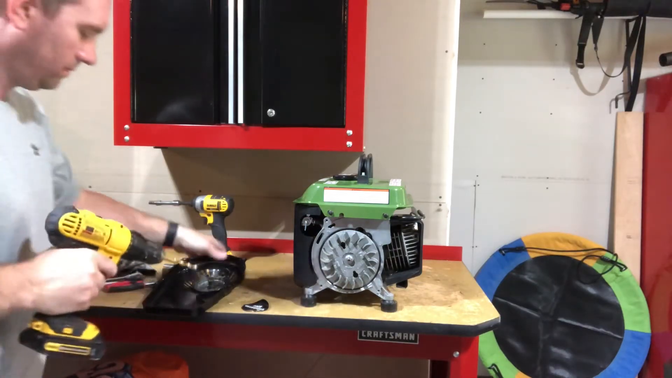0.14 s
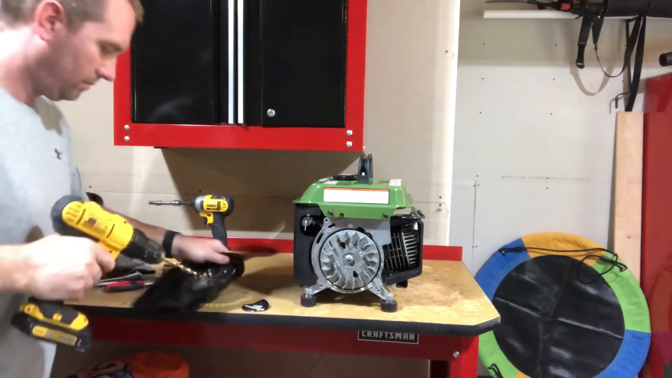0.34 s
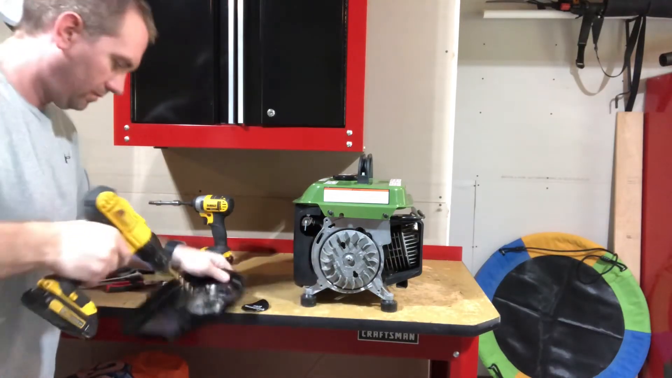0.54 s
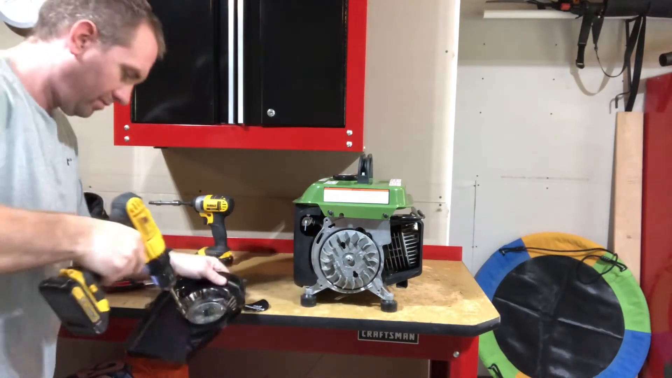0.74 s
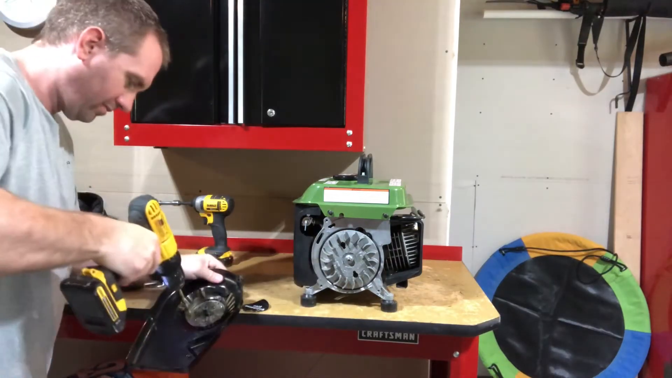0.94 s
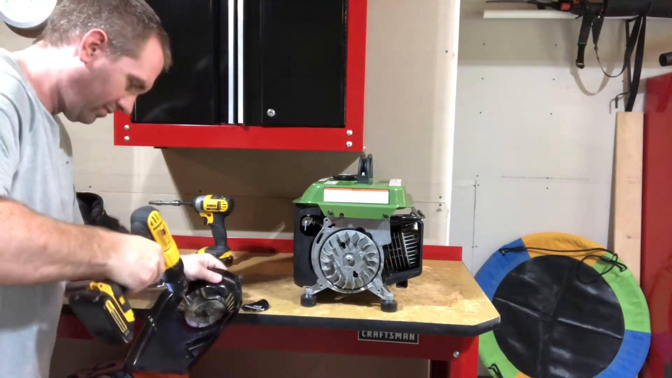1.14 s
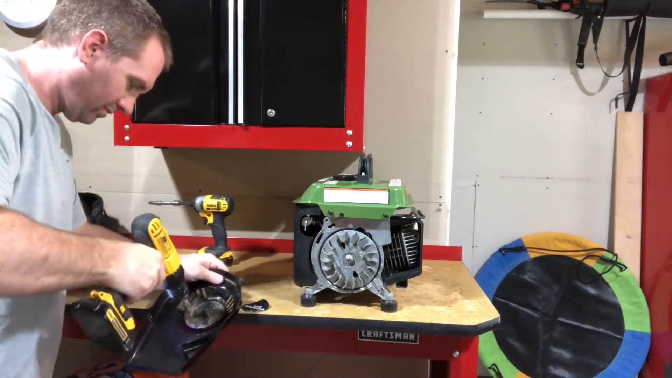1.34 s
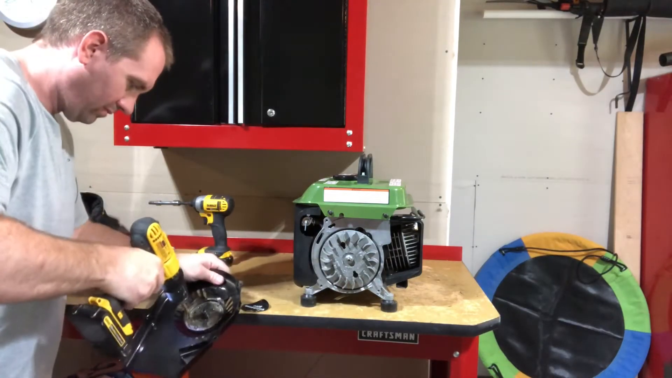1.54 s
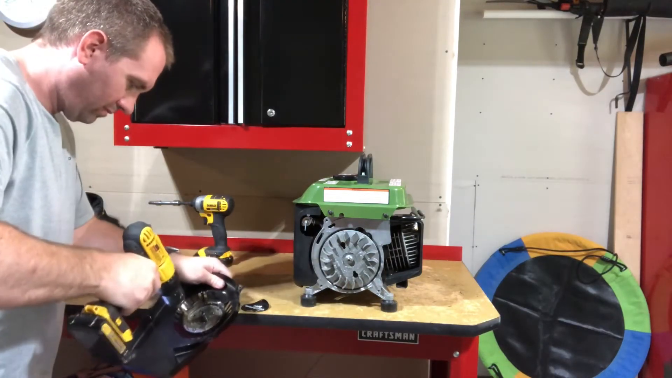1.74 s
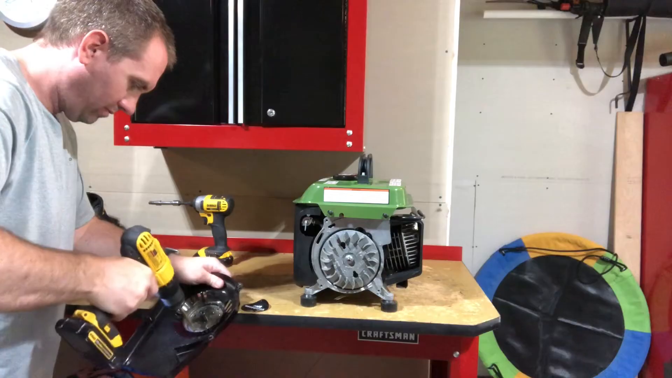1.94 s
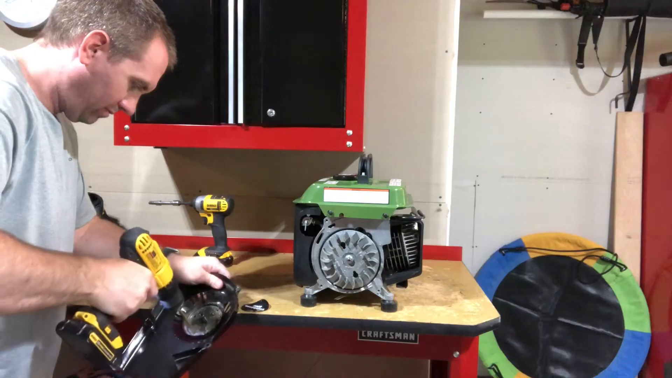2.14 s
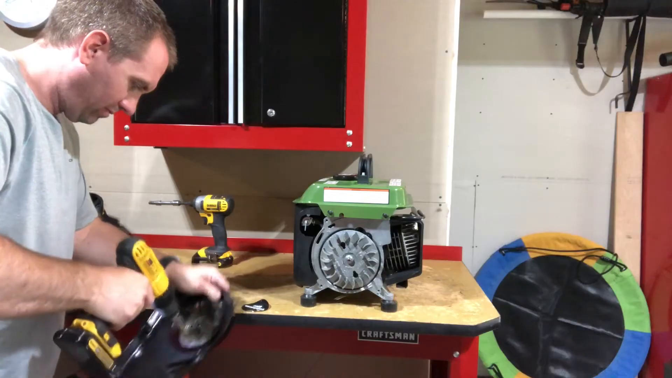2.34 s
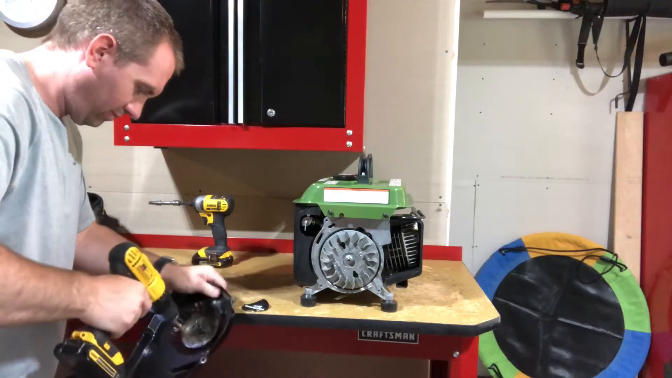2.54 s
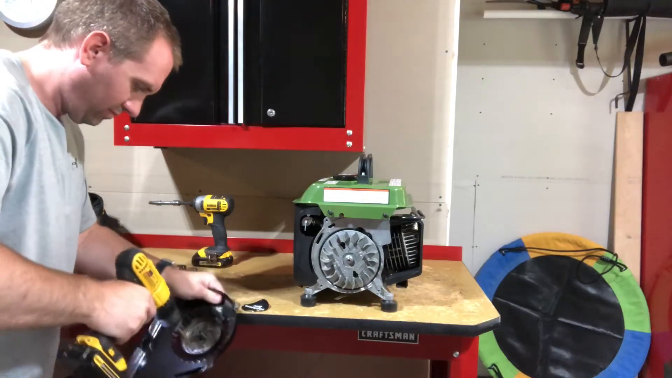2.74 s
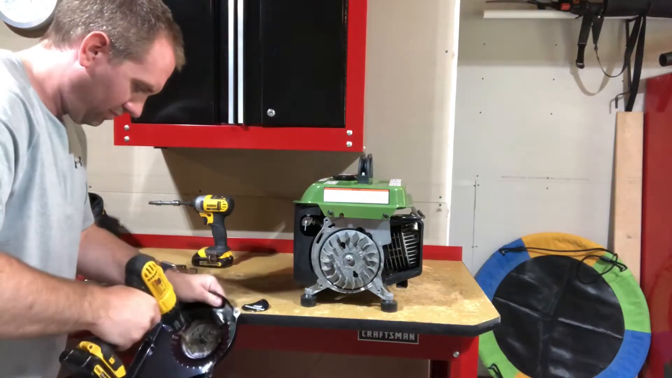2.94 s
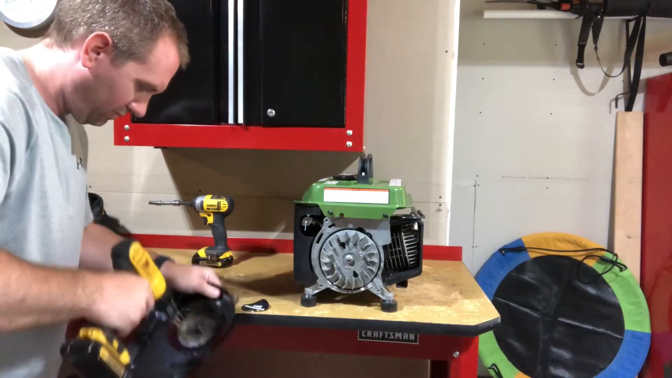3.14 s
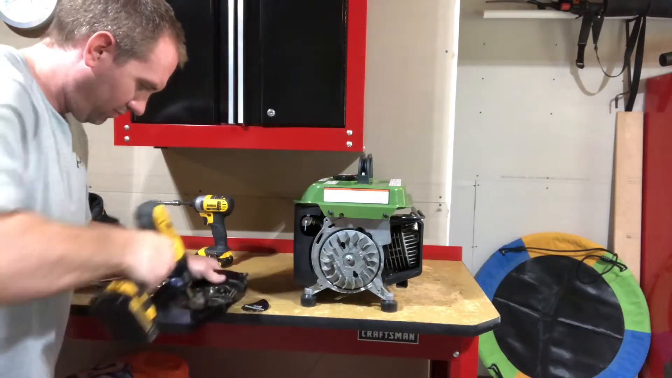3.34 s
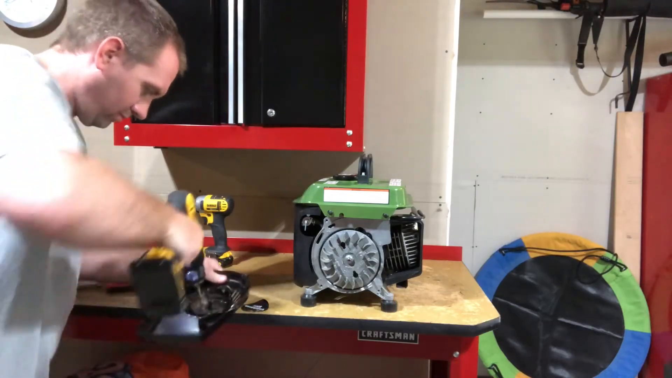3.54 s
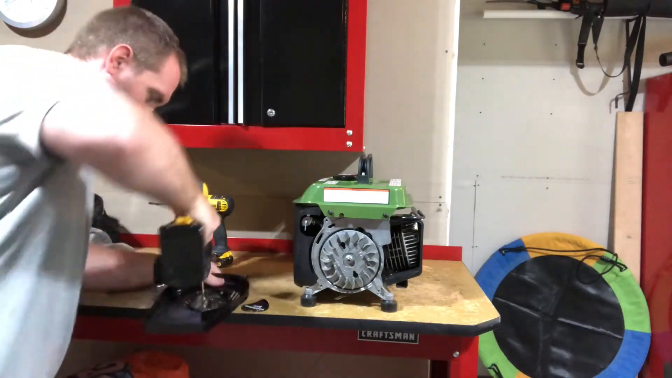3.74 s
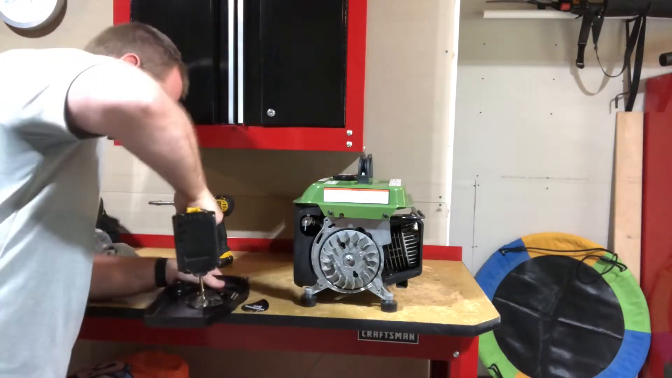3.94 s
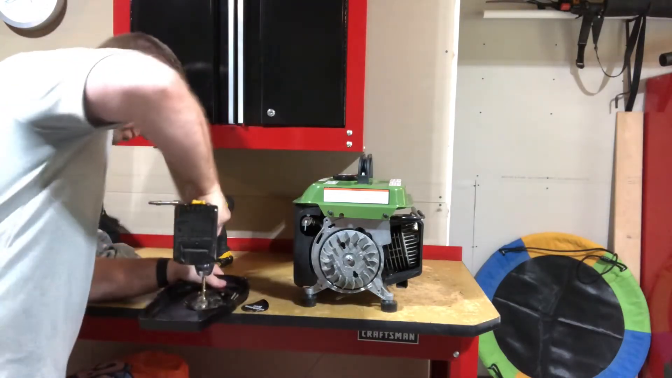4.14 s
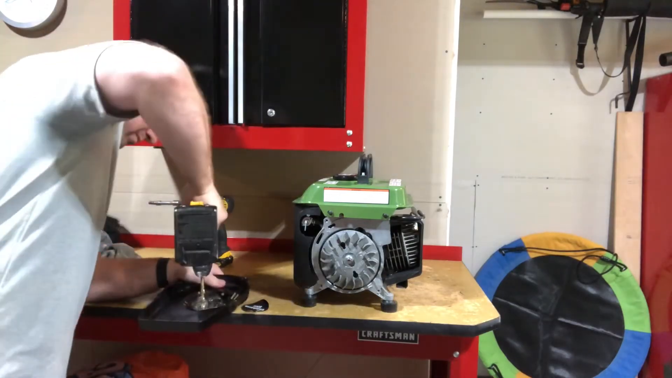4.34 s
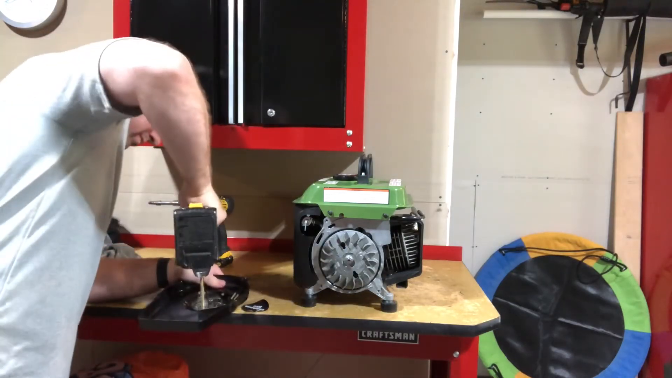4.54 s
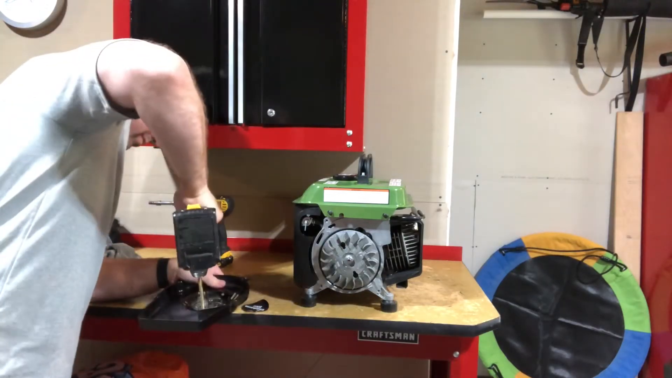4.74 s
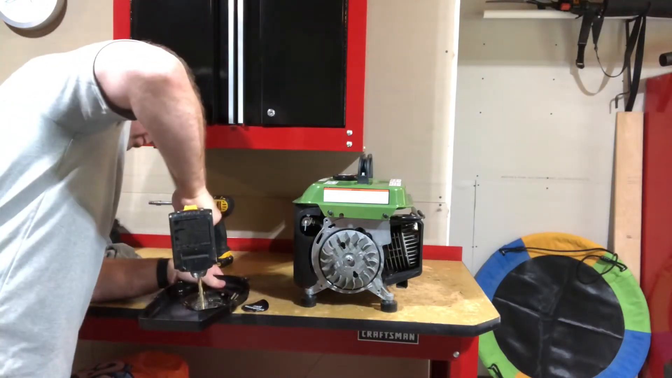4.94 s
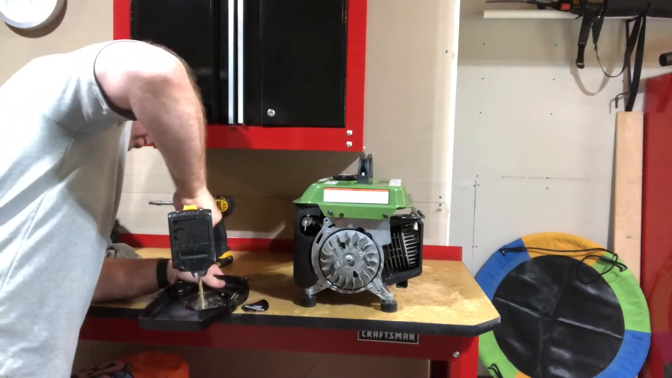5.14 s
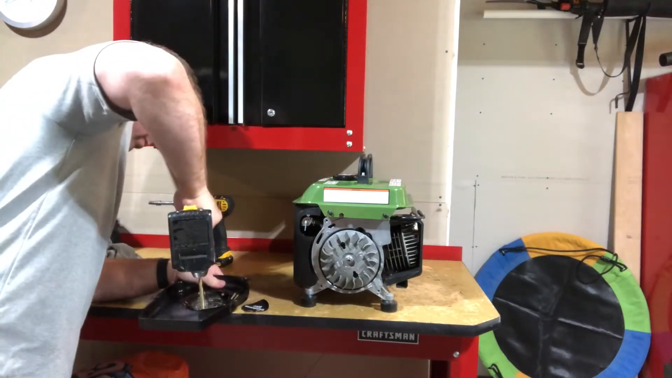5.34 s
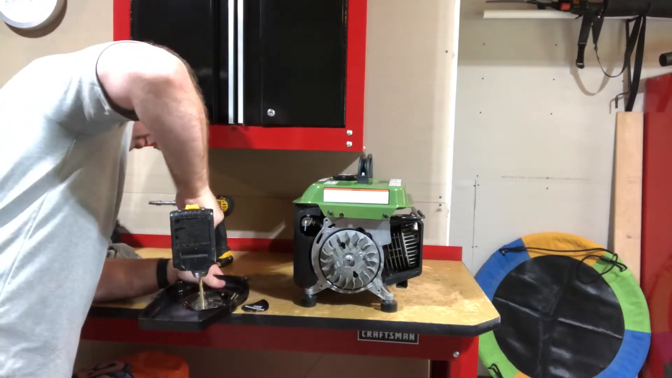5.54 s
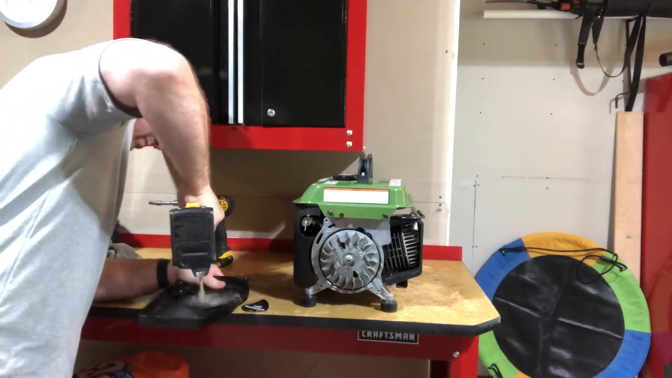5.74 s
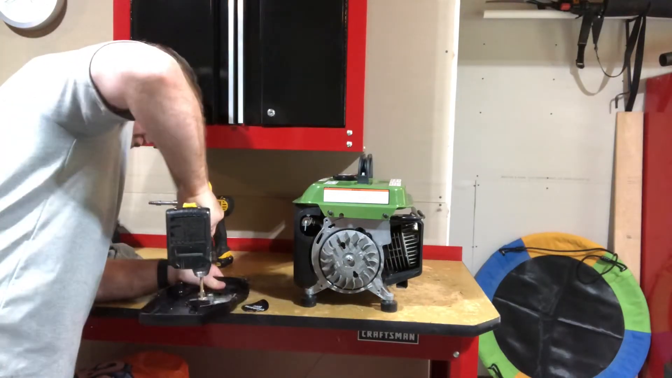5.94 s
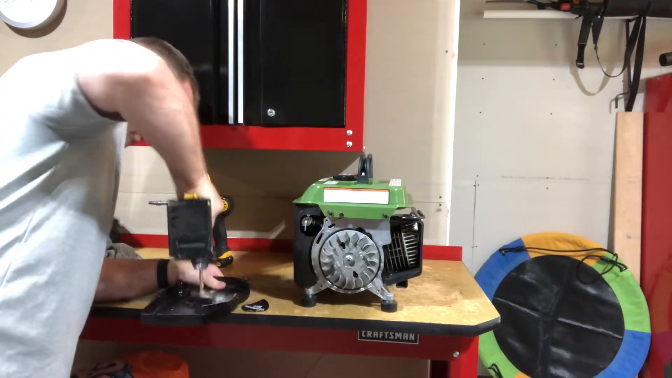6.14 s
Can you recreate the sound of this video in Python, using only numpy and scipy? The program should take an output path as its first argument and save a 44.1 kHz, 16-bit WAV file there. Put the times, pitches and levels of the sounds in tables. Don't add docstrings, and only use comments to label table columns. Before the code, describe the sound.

A bare, echoing garage with faint low air, heard close through one microphone. From 0 s, light rubbing; at 0.25 s a solid woody clunk as a drill is set down, with a bright cloth rustle, then a metal cover knocking the bench near 0.6 s. Faint touches and small clicks follow until 1.7 s. At 1.75 s the cordless drill runs free: gritty gears, airy hiss, a whine rising fast, holding, then gliding down from 2.4 s and stopping with sharp clicks near 2.8 s. Between 3.1 and 3.9 s, rubbing and knocks, strongest at 3.45 s, then a rattling cluster at 3.8 s. Boring starts at 4.33 s: whine leaps up, sags under load to its lowest around 4.9 s over a low bench hum, then recovers. At 5.6 s the bit catches; the sheet bangs, scrapes and rings, violently overloaded, ending about 5.9 s in a short echo.

```python
import sys
import numpy as np
from scipy import signal
from scipy.fft import rfft, irfft, next_fast_len
from scipy.io import wavfile

SR = 44100
rng = np.random.default_rng(int(sys.argv[2]) if len(sys.argv) > 2 else 0)


def to_linear_factor(level_db):
    exponent = np.asarray(level_db, float) / 20
    return 10 ** exponent


def wav_out(sig):
    wavfile.write(sys.argv[1], SR, np.round(np.clip(np.atleast_2d(sig).T, -1, 1) * 32767).astype(np.int16))


N = 272537
TIME_S = np.arange(N) / SR
BORING_FROM_S = 3.5


def rms_one(x):
    return x / np.sqrt(np.mean(x ** 2) + 1e-20)


def in_time(tables, columns, hold_s=0):
    rows = []
    silent = [-130] * columns
    for table in tables:
        start, end = table[0][0], table[-1][0] + hold_s
        rows += [(start - .003, *silent), *table]
        rows += [(end, *table[-1][1:]), (end + .004, *silent)]
    s, *values = np.transpose(rows)
    return [np.interp(TIME_S, s, v) for v in values]


def free_or_boring(free, boring):
    return np.where(TIME_S < BORING_FROM_S, free, boring)


def joining(starts, time_s):
    latest = np.clip(np.searchsorted(starts, TIME_S) - 1, 0, None)
    since = TIME_S - np.asarray(starts)[latest]
    return 20 * np.log10(np.clip(1 - np.exp(-(np.abs(since) / time_s) ** 2), 1e-4, 1))


def at_hz(points, hz):
    points_hz, values = np.transpose(points)
    return np.interp(np.log(hz + 1), np.log(points_hz), values)


def colour(x, spectrum):
    size = next_fast_len(len(x))
    hz = np.arange(size // 2 + 1) * SR / size
    skirt = np.minimum(1, np.minimum(hz / spectrum[0][0], spectrum[-1][0] / (hz + 1))) ** 6
    shaped = rfft(x, size) * to_linear_factor(at_hz(spectrum, hz)) * skirt
    return rms_one(irfft(shaped, size)[:len(x)])


def band(x, low_hz, high_hz):
    return signal.sosfilt(signal.butter(2, [low_hz, high_hz], "band", fs=SR, output="sos"), x)


def dull(x, hz):
    return signal.sosfilt(signal.butter(2, hz, fs=SR, output="sos"), x)


def drift(rate):
    r = np.exp(-80 * np.pi * rate / SR)
    slow = signal.lfilter([1], [1, -2 * r, r * r], rng.standard_normal(N // 40 + 2002))[2000:]
    return np.interp(np.arange(N) / 40, np.arange(len(slow)), rms_one(slow))


def grains(per_s, spread_db):
    sizes = to_linear_factor(spread_db * np.minimum(rng.exponential(1, N), 5)) * rng.choice([-1, 1], N)
    return rms_one(sizes * (rng.random(N) < per_s / SR))


def resonate(x, peaks, gain_db, shifting_db=0):
    out = x.copy()
    for hz, width_hz, level_db in peaks:
        r = np.exp(-np.pi * width_hz / SR)
        swell_db = shifting_db * drift(10.2) if shifting_db else 0
        poles = [1, -2 * r * np.cos(2 * np.pi * hz / SR), r * r]
        peak = signal.lfilter([(1 - r * r) / 2, 0, (r * r - 1) / 2], poles, x)
        out += to_linear_factor(level_db + gain_db + swell_db) * peak
    return out


def ring(push, modes):
    out = 0
    for k, (hz, level_db, t60) in enumerate(modes):
        r, w = to_linear_factor(-60 / (t60 * SR)), 2 * np.pi * hz / SR
        note = signal.lfilter([0, np.sin(w)], [1, -2 * r * np.cos(w), r * r], push + 1e-18)
        out = out + (-1) ** k * to_linear_factor(level_db) * note
    return out


# (pitch_hz, level_db per Hz)
AIR = [(25, -17), (75, 8), (200, 0.5), (500, -5), (1200, -8), (3000, -19.5), (8000, -24.5), (12000, -32),
       (15700, -30)]


def quiet_air():
    return to_linear_factor(-56) * colour(rng.standard_normal(N), AIR)


# (pitch_hz, t60_s)
GARAGE_T60 = [(100, 0.77), (300, 0.99), (900, 0.81), (2500, 1), (6000, 0.87), (13000, 0.7)]
# (pitch_hz, level_db)
GARAGE_COLOUR = [(100, 5.5), (400, 2.5), (1500, -5.5), (5000, -3.5), (14000, -12)]


def garage(x):
    t = np.arange(round(1.2 * SR)) / SR
    white = rng.standard_normal((2, len(t)))
    edges = 40 * 2 ** np.arange(0, 9.1, .5)
    tail = 0
    for k, (low, high) in enumerate(zip(edges, edges[1:])):
        hz = np.sqrt(low * high)
        level_db = at_hz(GARAGE_COLOUR, hz) - 60 * t / at_hz(GARAGE_T60, hz)
        tail = tail + band(white[k % 2], low, high) * to_linear_factor(level_db)
    tail = tail * np.clip((t - .004) / 0.013, 0, 1)
    return signal.fftconvolve(x, tail)[:N]


CLOTH_S = [
    .33,
    .39,
    .46,
    .56,
    .8,
]
# (pitch_hz, level_db per Hz)
CLOTH = [(3000, -2), (8000, -3), (15000, -2)]


def cloth():
    shape_db = np.interp(TIME_S, CLOTH_S, [-15, 0, -10, -4, -14], left=-99, right=-99)
    return colour(grains(9000, 2.0), CLOTH) * to_linear_factor(-62 + shape_db)


# (time_s, level_db)
HANDLING = [
    [(0.0, -62), (0.17, -70)],
    [(0.19, -60), (0.55, -55)],
    [(0.88, -74), (1.12, -84)],
    [(1.34, -76), (1.74, -97)],
    [(3.1, -60), (3.4, -70.5)],
    [(3.48, -56), (3.75, -71)],
    [(3.8, -66), (4.28, -80)],
]
# (pitch_hz, level_db per Hz)
RUB = [(300, 10), (700, -4), (1500, 1), (3000, -3), (6000, -9), (12000, -45)]


def handling():
    level_db, = in_time(HANDLING, columns=1)
    return colour(grains(2500, 2.5), RUB) * to_linear_factor(level_db + 2.2 * drift(20))


# (time_s, level_db)
LEAN = [
    (4.58, -56),
    (4.7, -45),
    (4.85, -43),
    (4.97, -54),
]


def lean():
    wander = .012 * np.cumsum(rng.standard_normal(N))
    phase = 2 * np.pi * 77 * TIME_S + wander
    hum = np.sin(phase) + to_linear_factor(5) * np.sin(2 * phase)
    return hum * to_linear_factor(in_time([LEAN], columns=1)[0])


# (pitch_hz, level_db, t60_s)
THUD = [(84.7, -7, 0.14), (116, -0.5, 0.074), (171.5, 0.5, 0.091)]
# (pitch_hz, level_db, t60_s)
BENCH = [(259.8, -1.5, 0.11), (319, 1, 0.028), (432.7, 4, 0.067), (452, 7, 0.044), (563, 4, 0.031),
         (609, 4, 0.036), (796, 1.5, 0.013)]
# (pitch_hz, level_db, t60_s)
BODY = [(953, 10, 0.02), (1275, 16.5, 0.0061), (1522, -2, 0.18), (1650, -42, 0.073), (2240, -37, 0.09),
        (2400, -26, 0.045)]


def sound_parts(pushes, blows):
    thud = to_linear_factor(-32) * ring(band(blows[0], 50, 230), THUD)
    wood_ring = to_linear_factor(-22) * band(ring(blows[1], BENCH), 243, 3100)
    bench = dull(wood_ring + to_linear_factor(17) * band(pushes[1], 303, 1060), 850)
    body_rough = to_linear_factor(12.5) * band(pushes[2], 1220, 2820)
    body = dull(to_linear_factor(-31) * ring(pushes[2], BODY) + body_rough, 2000)
    tick = to_linear_factor(8.5) * signal.lfilter([.5], [1, -.45], band(pushes[3], 3300, 10600))
    return thud + bench + body + tick


# (time_s, peak_db, hardness_db, contact_ms)
TOOL_SET_DOWN = [
    (.247, -16, 0.8, 20),
]
COVER_ON_BENCH = [(.581, -28.5, 8, 25.5), (.646, -35, -12, 20), (0.93, -53, 10, 30), (1.341, -45, 4.5, 39),
                  (1.398, -66, -4, 12), (1.681, -42.5, -4, 80), (3.12, -45.5, -5, 38),
                  (3.175, -49, -12, 30), (3.315, -52, -10, 12), (3.451, -27, -10, 18.5), (3.51, -50, 9, 17),
                  (3.574, -40, -17, 10), (3.767, -42, 8, 16), (3.774, -37.5, 4.5, 31),
                  (3.792, -39.5, 5, 25), (3.783, -44, 1, 20), (3.8, -46, 0, 20), (3.81, -42, -6, 15),
                  (3.893, -55, 6, 13)]
SMALL_CLICKS = [(0.197, -62, 7, 25), (0.225, -46, -1, 32), (.256, -24, -7, 8), (0.37, -50, 3, 40),
                (1.362, -54, 7, 16), (1.589, -53, 3, 14), (1.71, -47, 10.5, 15), (2.726, -28.5, 6, 11),
                (2.815, -28, 5, 12), (2.839, -36, 8.5, 4.8), (2.848, -43.5, 24.5, 7.9), (3.257, -42, 5, 11),
                (3.859, -56, -4, 7.5), (4.283, -44.5, -0.5, 17), (4.332, -45, -8, 22), (5.565, -20, 7, 15),
                (5.589, -29, 16, 10), (5.168, -30, 8, 10)]
SHEET_BANGS = [(5.615, -22.5, 17, 14), (5.645, -18, 4, 15), (5.663, -16, 4, 12), (5.692, -10, -9, 20),
               (5.723, -17, -4, 10), (5.743, -15, -3, 13), (5.784, -9.5, 2, 7.2), (5.834, -21, 10, 16),
               (5.86, -25, 8, 15)]
# (thud_db, bench_db, body_db, tick_db)
KINDS = [
    (-16, 0.7, -0.7, -13.5),
    (4, -0.1, -2.5, -14.5),
    (0, -18, -0.5, -8),
    (-16, -6, 4.5, 3.5),
]
HARD_SHARE = [
    -0.38,
    -0.023,
    0.14,
    1.065,
]


def knocks():
    pushes, blows = np.zeros((4, N)), np.zeros((4, N))
    rough = rng.standard_normal(N)
    t = np.arange(3000) / SR
    for kind_db, rows in zip(KINDS, (TOOL_SET_DOWN, COVER_ON_BENCH, SMALL_CLICKS, SHEET_BANGS)):
        for s, peak_db, hard_db, contact_ms in rows:
            at = round(s * SR)
            parts = to_linear_factor(peak_db + np.array(kind_db) + hard_db * np.array(HARD_SHARE))
            length_s = np.clip(contact_ms, 2, 40) / 1000
            envelope = np.minimum(t / (0.19 * length_s), 1) * np.exp(-2.3 * t / length_s)
            push = rough[at:at + len(t)] * envelope
            pushes[:, at:at + len(t)] += parts[:, None] * push
            blows[:, at] += parts * np.sqrt(np.sum(push ** 2))
    return sound_parts(pushes, blows), sound_parts(blows, blows)


STRUCK_S = [
    .2505,
    .5845,
    2.85,
]
# (pitch_hz, level_db, t60_s)
TOOL = [(903, -11, 0.047), (806, -11.5, 0.073), (944, -16, 0.044)]
COVER = [(177.5, -24.5, 0.16), (258, -21.5, 0.084), (302.5, -28, 0.19), (399, -28.5, .24), (465, -38, 0.26),
         (2557, -32, 0.1), (2575, -51, 0.4), (2363, -46, .29), (3343, -34, 0.057), (3400, -58, .2),
         (3480, -59, .2), (3881, -50, .19), (4350, -33, 0.03), (5030, -36, 0.031), (5593, -54, 0.6),
         (5612, -57, .4), (7499, -61, 0.4), (10800, -62, .2)]
CHUCK = [(11650, -34, 0.073), (11900, -51, 0.25), (11500, -55, 0.25), (12200, -52, .2), (351, -38.5, 0.62),
         (337, -41, 0.38)]
# (time_s, pitch_hz, level_db, t60_s)
PINGS = [(1.345, 7700, -55, .1), (1.368, 8000, -64, .1), (1.34, 1480, -51, 0.23), (1.4, 608, -46.5, 0.33),
         (2.726, 5440, -29, 0.051), (3.17, 273, -38.5, 0.21), (3.262, 2500, -50, 0.06),
         (3.27, 1500, -57, .1), (0, 3930, -67, .3), (5.035, 252, -29, .35), (5.12, 262, -31, .2),
         (5.19, 255, -28, .2), (2.815, 3900, -36, .04), (2.815, 2300, -36, .04), (2.728, 2500, -36, .04),
         (5.56, 7500, -30, .05), (3.8, 1780, -31.5, 0.047), (3.778, 2170, -33, 0.05),
         (3.768, 5400, -50, .04), (3.796, 5400, -48, .04), (3.796, 2640, -45, .04), (3.797, 1500, -43, 0.1),
         (3.797, 810, -38, .15), (3.453, 1200, -32, .03), (3.203, 1480, -51, 0.1), (2.35, 1020, -29, .3),
         (2.4, 950, -30, .2), (5.28, 430, -25, .1), (3.908, 1600, -46, .05), (.198, 3000, -56, .06),
         (0.2, 4400, -56, .05), (5.617, 3720, -13, 0.068), (5.618, 1980, -14, 0.052),
         (5.616, 5700, -9, .05), (5.664, 3500, -8, 0.089), (5.692, 2240, -6, .06),
         (5.743, 2730, -5.5, 0.055), (5.786, 1310, -10, .07), (5.836, 2500, -13, 0.03),
         (5.836, 5000, -8.5, 0.05), (5.861, 2780, -6.5, 0.047), (5.862, 1266, -13.5, 0.06),
         (5.625, 38, -27, .12), (5.566, 13500, -30, .02), (2.816, 800, -36, .05), (.584, 13000, -45, .04),
         (5.66, 1250, -8, .08), (5.68, 1070, -8, .1)]


def pings():
    struck = [(s, *mode) for s, modes in zip(STRUCK_S, (TOOL, COVER, CHUCK)) for mode in modes]
    out = np.zeros(N + SR)
    tap = 1. * (np.arange(SR) == 0)
    for s, hz, level_db, t60 in struck + PINGS:
        at = max(round(s * SR), 0)
        note = ring(tap, [(hz, level_db, t60)])
        out[at:at + SR] += band(note, hz / 2, min(hz * 2, 18000))
    return out[:N]


# (multiple, level_db)
SWITCH_OVERTONES = [
    (2, -18),
    (3, -29),
]
# (start_s, end_s, level_db)
PART_PRESSED = [
    (1.748, 1.787, -37.5),
    (1.818, 2.453, -39.5),
    (4.321, 4.36, -41),
    (4.39, 4.65, -44),
    (4.56, 5.614, -33.5),
]


def switch():
    phase = 2 * np.pi * 3930.2 * TIME_S
    tone = np.sin(phase)
    for multiple, level_db in SWITCH_OVERTONES:
        tone = tone + to_linear_factor(level_db) * np.sin(multiple * phase)
    pressed = 0
    for start, end, level_db in PART_PRESSED:
        swell_s = 0.065 * (end - start) + 0.021
        pressed = pressed + to_linear_factor(level_db) * np.clip((TIME_S - start) / swell_s, 0, 1) * (TIME_S < end)
    return tone * pressed * to_linear_factor(2.5 + 0.47 * drift(45))


# (time_s, level_db)
THRASH = [
    (5.616, -19),
    (5.639, -7),
    (5.665, -4.5),
    (5.695, -6),
    (5.74, -10),
    (5.785, -10),
    (5.825, -17),
    (5.869, -12.5),
    (5.911, -28),
]
# (pitch_hz, width_hz, level_db)
SHEET = [(1070, 41, -2), (1278, 31, 1), (1980, 18, -3.5), (2250, 23, -6.5), (2805, 40, -10),
         (3230, 310, -4.5), (3690, 105, -1.5), (5280, 500, -1), (5860, 170, -4.5), (6900, 300, -5),
         (7940, 38, -26)]
# (pitch_hz, level_db per Hz)
SHEET_COLOUR = [(35, -67), (60, -76), (163, -0.5), (211, -16), (454, -3.5), (614, 3.5), (1070, -7.5),
                (1590, -7.5), (3690, -6), (4440, -9), (5350, -12), (15600, -18.5)]
# (pitch_hz, level_db, t60_s)
SING = [(1075, 0, .22), (1245, -5, .1)]


def crash():
    thrash_db, = in_time([THRASH], columns=1)
    start = THRASH[0][0]
    sheet = colour(resonate(grains(6000, 2.54), SHEET, 8.3, 3.6), SHEET_COLOUR)
    thump_db = thrash_db - 8 + joining([start], .04)
    thump = rms_one(band(sheet, 85, 566)) * to_linear_factor(thump_db)
    clatter_db = thrash_db - 0.5 + joining([start], .03) + 2.1 * drift(64)
    clatter = rms_one(band(sheet, 740, 2560)) * to_linear_factor(clatter_db)
    fade_db = 20.5 * np.clip(TIME_S - start, 0, 1)
    scrape = rms_one(band(sheet, 4080, 22000)) * to_linear_factor(thrash_db + 0.5 - fade_db + 0.45 * drift(80))
    held = TIME_S < 5.81
    sing_db = thrash_db - 9.5 + joining([start], .05)
    sing = rms_one(ring(sheet, SING)) * held * to_linear_factor(sing_db)
    return thump + clatter + scrape + sing


# (pitch_hz, width_hz, level_db)
PANEL = [(81, 34, -2), (168.5, 18, 1.5), (244, 78, -4), (358, 8.3, -2), (440, 10, 2.5), (684, 42, -1),
         (820, 19, -0.5)]
# (pitch_hz, level_db per Hz)
RUMBLE = [
    [(29, -55), (50, -28.5), (162, -5.5), (206, -13), (350, -1.5), (395, -6.5), (619, -7.5), (751, -10),
     (900, -8.5), (1170, -34), (1980, -120)],
    [(29, -48), (50, -25), (162, 0), (206, -4), (253, 0), (296, -1.5), (436, -1), (510, -2), (900, -9),
     (1170, -45), (1980, -120)],
]


def rumble(effort_db, starts):
    level_db = effort_db + free_or_boring(-6.5, -6) + joining(starts, 0.051)
    shaken = resonate(grains(3000, 2.7), PANEL, 0.77, 1.7)
    shaken = free_or_boring(*[colour(shaken, spectrum) for spectrum in RUMBLE])
    return shaken * to_linear_factor(level_db - 2.5 + 0.46 * drift(16))


# (pitch_hz, width_hz, level_db)
HOUSING = [(1046, 39, -3.5), (1290, 38, -3.5), (1470, 22, -2), (1789, 60, -5), (2124, 100, -3.5),
           (2400, 136, -1), (2560, 88, -5), (3530, 59, -5)]
# (pitch_hz, level_db per Hz)
GEARS = [
    [(290, -4), (500, -5), (751, -8), (1030, -5.5), (1180, -9), (1460, -4), (3800, -14), (4940, -26),
     (8360, -120)],
    [(290, -9.5), (500, -7.5), (1270, -0.5), (1630, -3.5), (2360, -4.5), (3260, -8), (3800, -10),
     (4940, -31), (8360, -120)],
]


def gear_grind(effort_db, throb):
    level_db = effort_db + free_or_boring(-0.1, 0.15)
    grind = resonate(grains(6000, 2.5), HOUSING, 1.0, 4.6)
    grind = free_or_boring(*[colour(grind, spectrum) for spectrum in GEARS])
    return grind * to_linear_factor(level_db - 1.5 + 0.54 * throb + .9 * drift(35))


# (pitch_hz, width_hz, level_db)
VENTS = [(5270, 1450, -0.5), (7800, 300, -12), (10000, 120, -6)]
# (pitch_hz, level_db per Hz)
HISS = [
    [(2410, -11), (4100, 3.5), (5040, 1.5), (6270, -1.5), (7670, 3.5), (11000, -2), (14800, -4),
     (15600, -1)],
    [(2410, -18), (4100, -1.5), (5540, -8), (6170, -8.5), (8020, -4), (10700, -12), (15100, -13.5),
     (15600, -13)],
]


def fan_hiss(effort_db, throb, octaves_below_top):
    level_db = effort_db + free_or_boring(-4.5, -5.5) + 2.5 * octaves_below_top
    hiss = resonate(grains(20000, 2.5), VENTS, 1.2)
    hiss = free_or_boring(*[colour(hiss, spectrum) for spectrum in HISS])
    return hiss * to_linear_factor(level_db - 1 + 0.69 * throb + 0.41 * drift(49))


# (pitch_hz, width_hz, level_db)
FLARES = [(1815, 90, 9), (2370, 90, 10), (2500, 70, 9), (2640, 80, 8), (3110, 90, 10), (3300, 80, 8)]
# (pitch_hz, width_hz, level_db)
OCTAVE_FLARES = [(4600, 300, 9), (5400, 200, 3)]
WHINE_BREAKS_DB = [
    1.5,
    4.5,
]


def gear_whine(effort_db, starts, whine_db, mesh_turns, throb):
    rotor = np.sin(2 * np.pi * mesh_turns / 9)
    whine = to_linear_factor(whine_db - 7) * (1 + .7 * rotor) * np.sin(2 * np.pi * mesh_turns)
    hum = to_linear_factor(effort_db - 23.5) * rotor
    octave_db = effort_db + free_or_boring(-33, -28) + joining(starts, .15)
    octave = to_linear_factor(octave_db) * np.sin(4 * np.pi * mesh_turns)
    mesh = resonate(whine, FLARES, -8) + hum + resonate(octave, OCTAVE_FLARES, 0)
    return mesh * to_linear_factor(1.5 + 1.2 * throb + free_or_boring(*WHINE_BREAKS_DB) * drift(40))


# (time_s, pitch_hz, whine_db)
MESH = [
    [(1.765, 1700, -44), (1.795, 2500, -30), (1.83, 2950, -37), (1.95, 3250, -48), (2.1, 3310, -43),
     (2.36, 3270, -43), (2.41, 3240, -36), (2.46, 3090, -34), (2.53, 2780, -42), (2.595, 2490, -34),
     (2.64, 2350, -41), (2.7, 2150, -39), (2.77, 1830, -37), (2.86, 1700, -44)],
    [(4.34, 1500, -50), (4.375, 2680, -37), (4.395, 3050, -42), (4.43, 3600, -44), (4.51, 3380, -43),
     (4.6, 2770, -35), (4.72, 2640, -34), (4.785, 2370, -30), (4.86, 1960, -36), (4.92, 1990, -42),
     (4.955, 2280, -38), (4.99, 2650, -33), (5.1, 2720, -38), (5.4, 2880, -39), (5.61, 2690, -36)],
]
# (time_s, level_db)
EFFORT = [
    [(1.745, -55), (1.8, -28), (1.89, -19.5), (1.935, -24), (2.34, -25), (2.61, -30), (2.7, -32),
     (2.8, -33), (2.845, -27.5)],
    [(4.33, -39), (4.38, -28), (4.46, -21.5), (4.53, -27.5), (4.79, -27), (4.915, -32), (4.97, -27),
     (5.07, -24), (5.598, -25)],
]
WAVER = [
    .0035,
    .011,
]


def drill():
    effort_db, = in_time(EFFORT, columns=1, hold_s=.02)
    starts = [rows[0][0] for rows in EFFORT]
    mesh_s, mesh_hz = np.concatenate(MESH)[:, :2].T
    speed_hz = np.interp(TIME_S, mesh_s, mesh_hz)
    mesh_turns = np.cumsum(speed_hz * (1 + free_or_boring(*WAVER) * drift(60))) / SR
    throb = np.sin(2 * np.pi * mesh_turns / 190)
    whine_db = in_time(MESH, columns=2)[1]
    rough = rumble(effort_db, starts) + gear_grind(effort_db, throb)
    hiss = fan_hiss(effort_db, throb, np.log2(speed_hz / mesh_hz.max()))
    return rough + hiss + gear_whine(effort_db, starts, whine_db, mesh_turns, throb)


def scene():
    hits, blows = knocks()
    tool = cloth() + handling() + lean() + crash() + drill()
    whine, rings = switch(), pings()
    rings_wet_db = -38.5 - 8 * (TIME_S > 5.6)
    to_walls = to_linear_factor(-31.5) * blows + to_linear_factor(-37.5) * tool + to_linear_factor(-51) * whine + to_linear_factor(rings_wet_db) * rings
    mono = hits + tool + whine + rings + garage(to_walls) + quiet_air()
    return np.array([mono, mono])


def roll_off(x):
    return signal.sosfilt(signal.butter(12, 15740, fs=SR, output="sos"), x)


def record(dry):
    thin = signal.sosfilt(signal.butter(3, 32, "high", fs=SR, output="sos"), dry)
    return roll_off(np.clip(thin, -1, 1))


dry = scene()
out = record(dry)
wav_out(out)
```